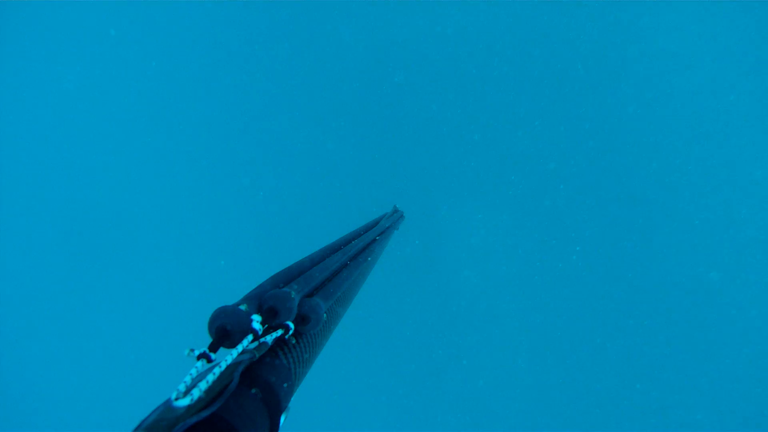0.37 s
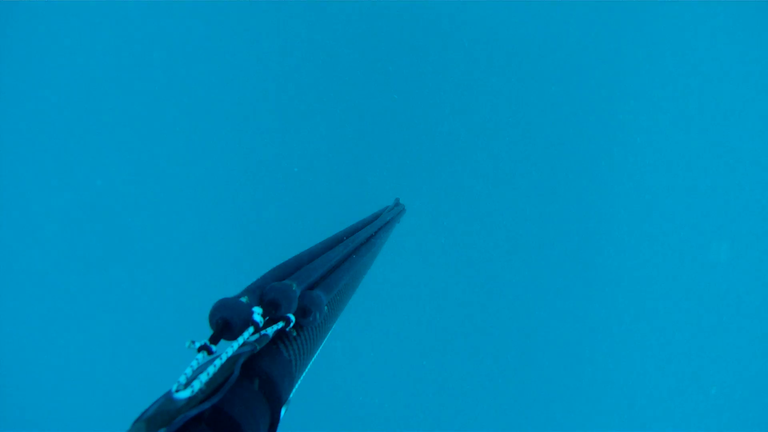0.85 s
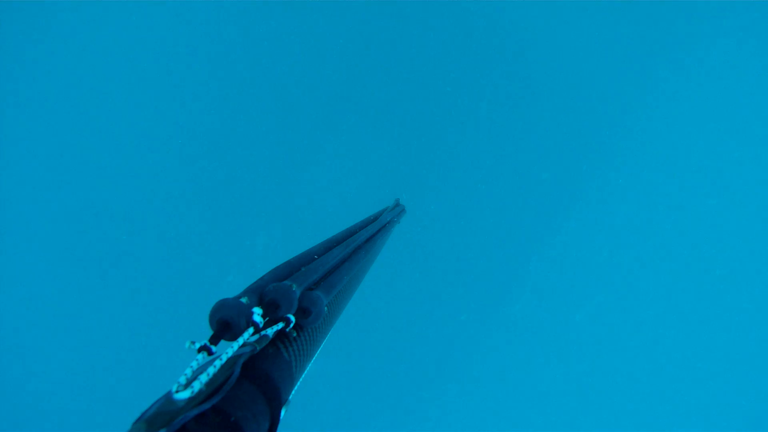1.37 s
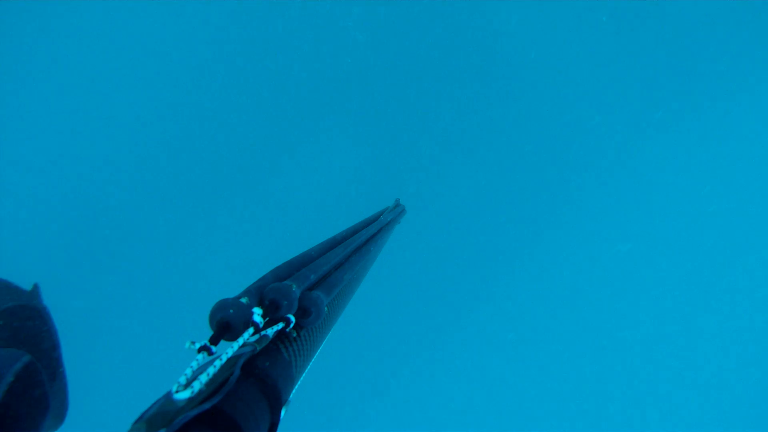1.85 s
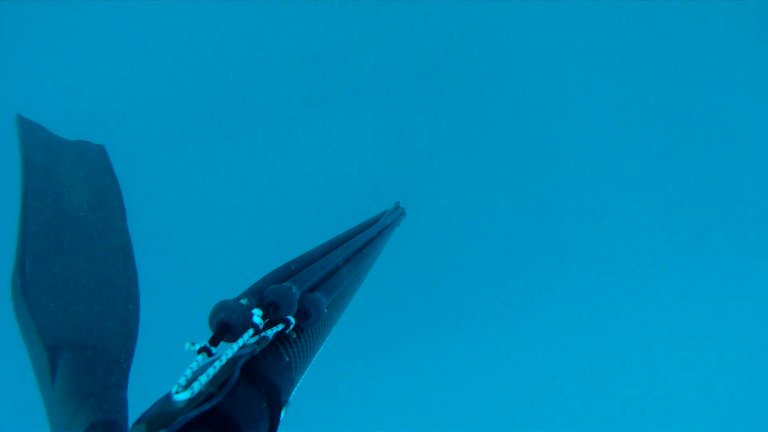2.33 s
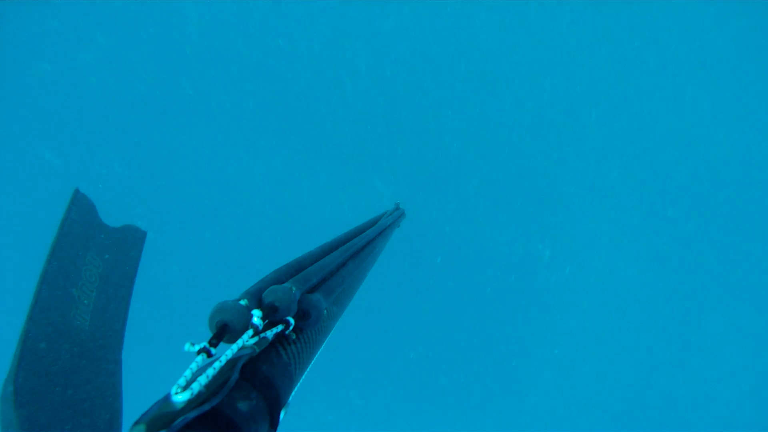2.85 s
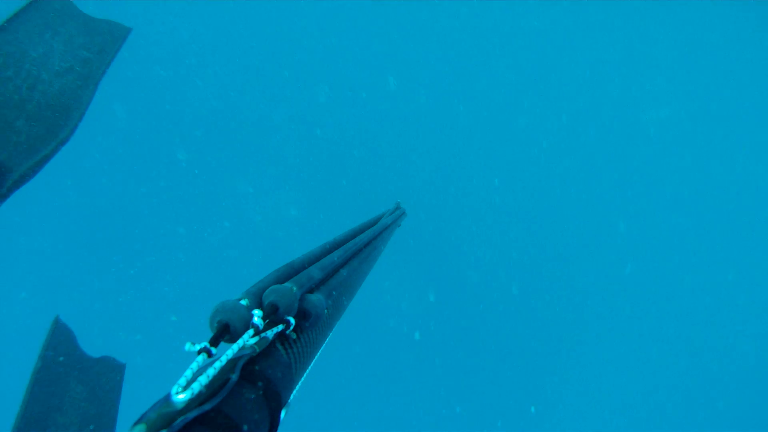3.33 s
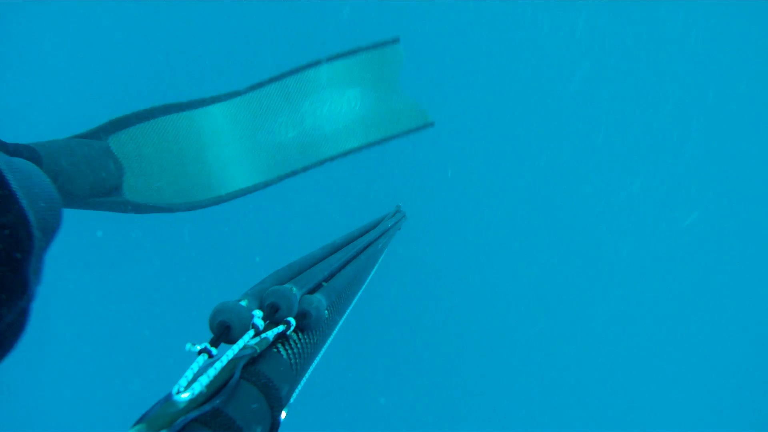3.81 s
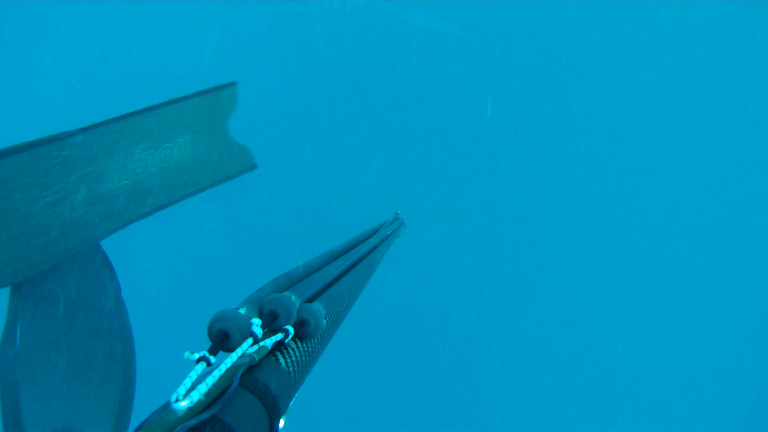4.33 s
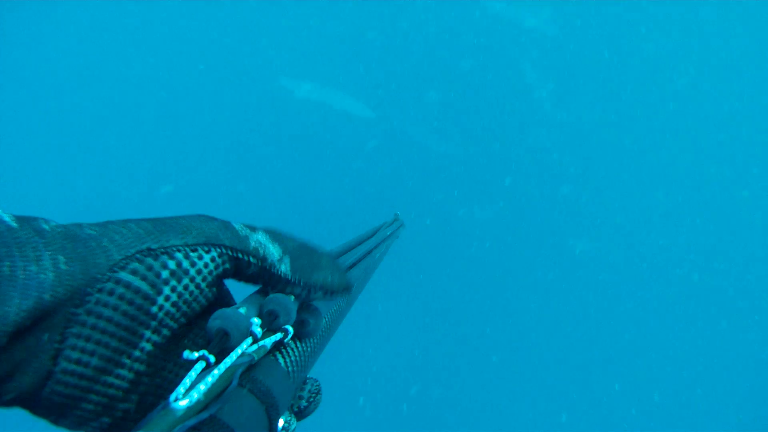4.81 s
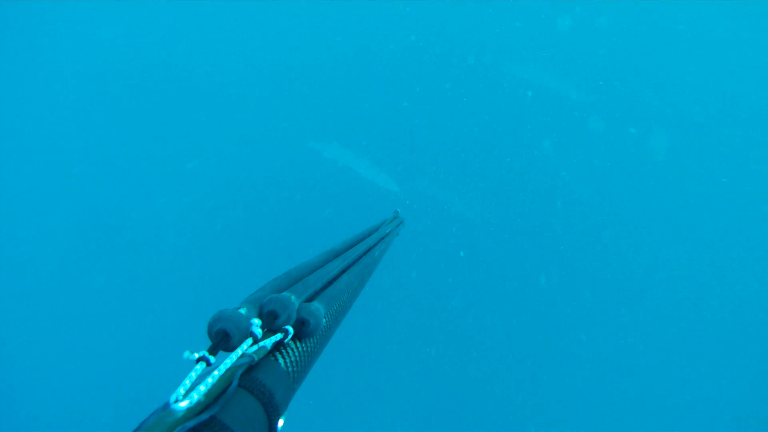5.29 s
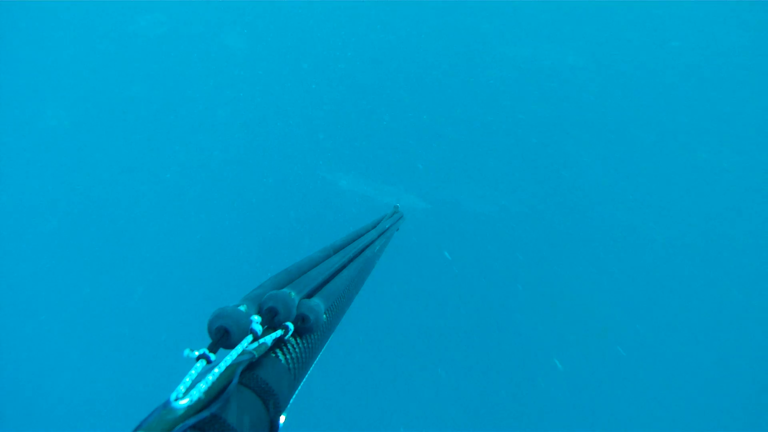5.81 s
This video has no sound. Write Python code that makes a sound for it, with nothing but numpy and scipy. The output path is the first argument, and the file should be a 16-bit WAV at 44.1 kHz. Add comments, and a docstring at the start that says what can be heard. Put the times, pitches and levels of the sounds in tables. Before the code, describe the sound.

Underwater, quiet hiss with tiny clicks and a sudden clipped crack; later, dense hollow clacks, scrapes and low thuds of gun handling, fading to hiss.

```python
"""A gloved hand rubs and rattles a speargun under water, heard by a camera in a hard housing riding on it.
Trains of tiny impacts and stick-slip grains ring the housing's damped modes; jolts sway the mount at a low pitch.
Before the hand come faint shaped-noise hiss, swell rumble, soft knocks, far clicks, a low tone and one sharp snap.
The recorder ducks after loud blows, clips, and holds each sample of a 12 kHz stream, which mirrors the spectrum."""
import sys
import numpy as np
from scipy import signal
from scipy.fft import rfft, irfft, next_fast_len
from scipy.io import wavfile
from scipy.ndimage import uniform_filter1d

SR = 44100
rng = np.random.default_rng(int(sys.argv[2]) if len(sys.argv) > 2 else 0)


def boost(x):
    """Linear amplitude factor 10**(x/20) for a level x in decibels (scalar or array-like)."""
    u = np.asarray(x, float) / 20
    return 10 ** u


def store_pcm(level_fs):
    """Save levels as 16-bit WAV."""
    pcm = np.round(np.clip(level_fs, -1, 1) * 32767).astype(np.int16)
    wavfile.write(sys.argv[1], SR, np.atleast_2d(pcm).T)


N = 271639  # length in samples

# Blows on gun and housing. Each row: start in seconds, peak of the middle modes in dB,
# chatter rate in Hz, treble in dB against that peak, contact length in ms.
BLOWS = [(0.7301, -4, 1723, -27, 3.9), (0.736, 6, 1990, -9.5, 3.6), (0.7541, -19.5, 1930, -8, 1.2),
         (2.8932, -30, 2200, 3, 4.3), (2.965, -42, 2200, -15, 6), (3.681, -31, 1510, -8, 1.5),
         (3.9177, -20, 940, -30, 0.8), (3.96, -12.5, 1750, -13, 1.2), (3.9627, -1.5, 2117, -4, 2.7),
         (3.9832, -35.5, 800, 13.5, 0.9), (3.999, -21.5, 2410, -24, 9.3), (4.0193, -6, 1780, -9.5, 2.3),
         (4.0497, -11.5, 1490, -14.5, 0.9), (4.07, -21.5, 2210, -16, 9), (4.0805, -13, 935, -11, 1.7),
         (4.101, -17, 1710, -22, 3.2), (4.129, -20.5, 814, -22.5, 11.4), (4.143, -13, 946, -15.5, 3.7),
         (4.183, -15, 850, -12.5, 3.6), (4.229, -11.5, 1575, -21, 6.2), (4.2714, -11.5, 1850, -13.5, 0.7),
         (4.2749, -9, 1580, -32, 0.8), (4.2789, 0.5, 1920, -10.5, 1.5), (4.291, -12, 920, -23, 1.6),
         (4.3052, -6.5, 1685, -19, 3.5), (4.3091, 6, 1670, -17.5, 1.6), (4.3323, -21.5, 1500, -20, 1.4),
         (4.349, -23.5, 1440, -45, 2.4), (4.3958, -29, 800, -13, 3), (4.4762, -8, 1116, -15, 4),
         (4.4839, -5.5, 1953, -22, 2.8), (4.489, -6, 810, -9.5, 1.6), (4.503, -9, 1512, -5, 5.6),
         (4.5074, 3.5, 1873, -9, 2.6), (4.517, -17.5, 960, -22, 2.4), (4.582, -23, 954, -16.5, 5.1),
         (4.598, -20, 1437, -7, 9.7), (4.6106, -3.5, 1580, -9, 0.9), (4.6457, -19, 920, -38, 2.6),
         (4.6674, -7, 1900, -12, 0.9), (4.697, -27.5, 920, -13, 3), (4.757, -28, 800, -23, 9.7),
         (4.8031, -9.5, 1760, -17.5, 0.8), (4.808, -15.5, 1740, -11.5, 2.8), (4.8353, -14, 1500, -29, 0.9),
         (4.8482, 3, 1900, -16, 1.6), (4.9321, -10, 960, -26, 0.8), (4.968, -29.5, 1860, -20, 2),
         (5.02, -23, 800, -31, 10.5), (5.047, -19, 1140, -9, 2.5), (5.0538, -13.5, 960, -8, 3.9),
         (5.0872, -7.5, 1570, -23, 1.7), (5.093, -11.5, 1884, -15, 0.8), (5.1017, -16, 850, -2.5, 1.5),
         (5.1284, -18.5, 870, -33, 8.3), (5.143, -20.5, 1944, 5, 4), (5.1524, -8, 2120, -24, 1.4),
         (5.233, -3.5, 1550, -19, 1.7), (5.257, -19, 1900, -12.5, 1.8), (5.276, -29.5, 2110, -12, 1.8),
         (5.3247, -13.5, 1560, -22, 3.1), (5.332, -27, 890, -11, 5), (5.412, -11.5, 1613, -14, 1.1),
         (6.029, -32, 2300, 7, 0.8)]
# Middle modes of the housing. Each row: pitch in Hz, relative level in dB, 60 dB decay time in seconds.
BODY = [(850, -22, 0.076), (960, -4.5, 0.024), (1243, 2, 0.0053), (1575, -4, 0.011), (1939, 0.5, 0.01),
        (2200, -23, 0.025)]
# Gloved hand on the gun, rising with sliding speed. Each row: time in seconds, pressure in dB, brightness in dB.
HAND = [(3.66, -57, 0), (3.775, -57, -7), (3.8, -45.5, -5), (3.9, -40.5, -18), (4.0, -30.5, -2),
        (4.06, -32.5, 1), (4.2, -37.5, -1), (4.3, -37.5, -2), (4.335, -49, -8), (4.39, -36, -5),
        (4.45, -40.5, 4.5), (4.55, -38.5, 0.5), (4.7, -40, 1), (4.78, -34, 3), (4.88, -41, 1),
        (4.99, -40, 12), (5.04, -33, 12.5), (5.07, -36.5, 25.5), (5.1, -29.5, 16.5), (5.12, -36.5, 0),
        (5.145, -33, -4), (5.19, -52, 8.5), (5.43, -61, 9), (5.5, -59.5, 8), (5.69, -66, 1), (5.72, -49, 3),
        (5.8, -44.5, -8), (5.84, -74, 4)]


def unit(x):
    """Scale to rms 1."""
    return x / np.sqrt(np.mean(x ** 2))


def band(x, lo_hz, hi_hz):
    """Band-pass with a second-order Butterworth prototype."""
    return signal.sosfilt(signal.butter(2, [lo_hz, hi_hz], "bandpass", fs=SR, output="sos"), x)


def walk(rate):
    """Random levels held 1 / rate s and slewed; spread near 1."""
    hold = int(SR / rate)
    steps = np.repeat(rng.standard_normal(N // hold + 1), hold)
    return unit(uniform_filter1d(steps, hold)[:N])


def column(table, index, outside=None):
    """One column of a curve, per sample."""
    rows = np.array(table)
    return np.interp(np.arange(N) / SR, rows[:, 0], rows[:, index], left=outside, right=outside)


def add(out, s, sound, db):
    """Mix a short sound in at time s with its peak at db."""
    i = int(s * SR)
    out[i:i + len(sound)] += (boost(db) * sound / np.abs(sound).max())[:N - i]


def swells(rows, t60):
    """Gain that climbs to each (s, dB, rise s) and then dies away; powers add."""
    power = np.zeros(N)
    for s, db, rise_s in rows:
        i = np.arange(max(int((s - 4 * rise_s) * SR), 0), min(int((s + t60) * SR), N))
        late = i / SR - s
        climb, decay = np.exp(-(late / rise_s) ** 2), 1e6 ** (-late / t60)
        power[i] += boost(2 * db) * np.where(late < 0, climb, decay)
    return np.sqrt(power)


def tone(hz, width, waver_db):
    """A soft spring shaken near one pitch: pitch and level waver."""
    turn = np.cumsum(hz + width * walk(25)) / SR
    return unit(np.cos(2 * np.pi * turn) * boost(waver_db * walk(30)))


def ring(modes, lo_hz, hi_hz):
    """What one tiny impact leaves ringing, a row per mode; water damps both ends of the range."""
    t = np.arange(SR // 20) / SR
    rows = np.array([boost(db) * np.sin(2 * np.pi * hz * t) * 1000 ** (-t / t60) for hz, db, t60 in modes])
    return band(band(rows, lo_hz, hi_hz), lo_hz, hi_hz)


def housing_rings():
    """The hard housing as three groups of damped modes: bass, middle and treble."""
    # Each row of both: pitch in Hz, relative level in dB, 60 dB decay time in seconds.
    bass_modes = [(93.7, -2, 0.049), (199, -4, 0.018), (260, -19, 0.0054), (343, -5.5, 0.025),
                  (432.5, 0, 0.015), (624, -1.5, 0.019)]
    treble_modes = [(2604, -2.5, 0.011), (3040, -4, 0.0086), (3486, 5, 0.012), (4000, -35, 0.034),
                    (4860, -7, 0.006), (5170, -23, 0.0048)]
    return ring(bass_modes, 81.3, 712), ring(BODY, 644, 2574), ring(treble_modes, 1720, 5430)


def held(s):
    """Whether the hand is on the gun at time s."""
    return HAND[0][0] < s < HAND[-1][0]


def hiss():
    """Smooth water noise coloured by the housing, flickering a little band by band."""
    # Broad colour. Each row: frequency in Hz, relative spectral level in dB.
    slope = np.array([(53, -62), (90, -7), (140, -18.5), (172, -15.5), (453, -22.5), (795, -20),
                      (1090, -19.5), (1210, -20.5), (1420, -15.5), (2240, -14), (2870, -23.5), (5310, -26),
                      (6000, -36), (7800, -73), (13200, -120)])
    # Peaks on that colour. Each row: centre in Hz, width in Hz, height in dB (negative for a dip).
    peaks = [(670, 18, 2), (800, 25, 9), (1027, 21, -10), (1201, 25, 11), (1537, 110, 7), (1680, 63, 9),
             (1990, 37, 4.5), (2140, 160, 8.5), (2463, 280, 6), (3770, 390, 5.5)]
    # Level of the part above about 1 kHz. Each row: time in seconds, level in dB.
    loudness = [(0, -52), (.32, -50.5), (.7, -53), (1.1, -50.5), (1.68, -54), (2.6, -57.5), (2.92, -54.5),
                (3.1, -55.5), (6.16, -54.5)]
    low_part_db = -4.5  # against the upper part
    size = next_fast_len(N)
    hz = np.arange(size // 2 + 1) * SR / size + 1
    db = np.interp(np.log(hz), np.log(slope[:, 0]), slope[:, 1])
    db = db + sum(p / (1 + (2 * (hz - f) / w) ** 2) for f, w, p in peaks)
    colour = rfft(rng.standard_normal(size)) * boost(db)
    parts = [0, 0]  # upper, low
    for centre in 90 * 2 ** np.arange(7):  # overlapping octave bands
        share = np.clip(1 - np.abs(np.log2(hz / centre)), 0, 1)
        parts[centre < 1000] += irfft(colour * share, size)[:N] * boost(1.6 * walk(11))
    return boost(column(loudness, index=1)) * (unit(parts[0]) + boost(low_part_db) * unit(parts[1]))


def swell_gain():
    """Slow water movement around the gun, as a gain."""
    # Each row: time in seconds, level in dB.
    movement = [(0.0, -44.5), (0.36, -48), (0.51, -60), (0.77, -36.5), (1.22, -51), (2.85, -40.5),
                (3.09, -48), (3.41, -35.5), (3.52, -42.5), (4.1, -23.5), (4.22, -31), (5.06, -29.5),
                (5.13, -21), (5.27, -32.5), (5.63, -33.5), (5.68, -43), (6.11, -34.5), (6.16, -38)]
    return boost(column(movement, index=1))


def rumble(swell):
    """Deep noise that follows the slow water movement."""
    return swell * unit(band(rng.standard_normal(N), 13.7, 37.4))


def mount_sway(swell):
    """The springy mount sways at a low pitch after each jolt; the swell keeps it moving faintly."""
    # Each row: moment of full swing in seconds, level in dB, rise in seconds.
    jolts = [(.35, -48, .03), (.7, -43, .03), (.762, -24.5, 0.0087), (1.3, -49, 0.032), (3.4, -41, 0.041),
             (3.66, -39.5, 0.032), (3.84, -30.5, 0.018), (3.94, -25, .02), (3.99, -21, 0.0098),
             (4.03, -19.5, .012), (4.1, -23.5, 0.018), (4.165, -15, .03), (4.245, -19.5, 0.016),
             (4.32, -16.5, 0.015), (4.485, -11.5, 0.0091), (4.515, -15, 0.0093), (4.625, -17, 0.0088),
             (4.857, -15.5, 0.012), (5.1, -20, .01), (5.16, -22, 0.0085), (5.28, -29, .02),
             (5.42, -27, 0.012), (5.63, -38, 0.016), (5.81, -37, 0.038), (6.04, -40.5, .03)]
    shake_db = -15  # sway kept up by the swell, against the swell's level
    sway = np.hypot(swells(jolts, t60=.3), boost(shake_db) * swell)
    return sway * tone(67.4, width=7.82, waver_db=2.95)


def knocks():
    """Soft knocks: short damped tones with a soft start and some noise around their pitch."""
    # Each row: start in seconds, peak in dB, pitch in Hz.
    soft_knocks = [(.116, -44, 342), (2.84, -48, 380), (2.865, -48, 400), (3.79, -37.5, 353),
                   (3.897, -31, 306), (4.021, -17.5, 304), (4.277, -19, 320), (5.018, -23, 610),
                   (5.091, -13, 433), (5.256, -26, 377), (5.719, -40, 374), (5.723, -37.5, 800),
                   (5.739, -43, 820), (5.778, -29.5, 378), (5.781, -34.5, 854)]
    out = np.zeros(N)
    for s, db, hz in soft_knocks:
        turn = np.arange(SR // 20) * hz / SR
        noise = band(rng.standard_normal(len(turn)), hz / 2, 4 * hz)
        swing = np.sin(2 * np.pi * turn) + 0.45 * noise
        add(out, s, turn * np.exp(-turn / 1.47) * swing, db)  # decay in cycles
    return out


def ticks():
    """Faint far clicks: tiny and broad with a hint of pitch, plus fainter ones at random moments."""
    # Each row: start in seconds, peak in dB.
    far_clicks = [(0.259, -43.5), (0.2896, -43), (0.561, -44), (0.9385, -39.5), (0.9457, -49), (1.34, -48),
                  (2.143, -46.5), (2.7719, -46), (2.8519, -45), (2.9867, -46), (3.2081, -46),
                  (3.2983, -41.5), (3.4296, -39), (3.557, -41), (3.5925, -41.5)]
    mean_hz, stray_count, stray_db = 3660, 11, -47.5
    out, t = np.zeros(N), np.arange(SR // 100) / SR
    strays = [(place * N / SR, stray_db + 5 * (size - .5)) for place, size in rng.random((stray_count, 2))]
    for s, db in far_clicks + strays:
        noise = rng.standard_normal(len(t))
        pitch = np.cos(2 * np.pi * mean_hz * (1 + 0.097 * noise[0]) * t)
        click = (pitch + 2.7 * noise) * t * np.exp(-t / 0.0017)
        add(out, s, band(click, 1900, 5600), db)
    return out


def hum():
    """A faint low tone that comes and goes, wavering in pitch and level."""
    # Each row: loudest moment in seconds, level in dB.
    hum_peaks = [(.78, -45.5), (2.44, -60.5), (2.8, -57.5), (2.98, -50), (3.24, -57.5), (3.64, -51.5),
                 (3.9, -37)]
    rise_s, t60_s = 0.044, 0.42
    gain = swells([(s, db, rise_s) for s, db in hum_peaks], t60_s)
    return gain * tone(170, width=2.9, waver_db=2.5)


def blows(rings):
    """Each contact chatters for a few ms; the train of tiny impacts rings the housing."""
    out, chance = np.zeros(N), rng.standard_normal((len(BLOWS), 66))
    for (s, db, hz, treble_db, ms), c in zip(BLOWS, chance):
        # thud against the peak; 6 dB less while the hand is off the gun
        thud_db = -12 + 0.03 * db - 6 * (not held(s))
        count = int(np.clip(ms * hz / 1000 + .5, 1, 24))
        place = np.cumsum(np.clip(1 + 0.066 * c[:count], .5, 2)) * SR / hz
        train = np.zeros(SR // 40)
        train[(place - place[0]).astype(int)] = boost(5.67 * c[24:24 + count])
        train[0] *= .6  # lighter first touch
        # slow chatter comes from softer, longer pushes
        push = np.hanning(int(np.clip(.45 * SR / hz, 4, 24)))
        soft, hard = np.convolve(train, push), np.convolve(train, push[::2])
        # every spot struck favours other modes; middle modes near the chatter rate ring most
        spots = boost(3 * c[48:]).reshape(3, 6)
        spots[1] *= boost(-2.5 * np.abs(np.log2(np.array(BODY)[:, 0] / hz)))
        levels = (db + thud_db, db, db + treble_db)
        for force, rows, spot, level_db in zip((soft, soft, hard), rings, spots, levels):
            add(out, s, signal.fftconvolve(force, spot @ rows), level_db)
    return out


def gurgle(rate):
    """Trapped water pockets: short low notes that glide, rate of them a second; rms 1."""
    out, t = np.zeros(N), np.arange(SR // 15) / SR
    for place, pitch, glide, size in rng.random((int(rate * N / SR), 4)):
        hz = 140 * 2 ** (2.4 * pitch)
        turn = hz * t * (1 + 10.0 * (glide - .3) * t)
        add(out, place * N / SR, turn * np.exp(-turn / 0.98) * np.sin(2 * np.pi * turn), 12 * size)
    return unit(out)


def rub(rings):
    """Dense stick-slip grains of uneven size, in clumps, excite the same housing modes; water gurgles along."""
    clumps, bright = walk(45), column(HAND, index=2)
    # grit shaken loose rattles on after a blow
    rattle_db, rattle_t60_s = -26, 0.063
    shaken = [(s + .003, db + rattle_db, .001) for s, db, *_ in BLOWS if held(s)]
    pressure = boost(column(HAND, index=1, outside=-99))
    force = np.hypot(pressure, swells(shaken, rattle_t60_s))
    out = force * boost(-0.5) * gurgle(60)
    # bass, middle, treble modes: level in dB, share of brightness, grains a second, clumping in dB
    layers = (-0.5, 0, 500, 3.5), (-6.5, 0.58, 2500, 3.0), (-26, 1.12, 7000, .6)
    for (db, tilt, rate, clump_db), rows in zip(layers, rings):
        hits = (rng.random(N) < rate / SR) * rng.standard_normal(N)
        grains = hits * boost(1.3 * rng.exponential(size=N) + clump_db * clumps)
        scrape = unit(signal.fftconvolve(grains, rows.sum(axis=0))[:N])
        out = out + force * boost(db + tilt * bright) * scrape
    return out


def scene():
    """Water, swaying mount and everything that touches the gun, summed to one channel."""
    swell, rings = swell_gain(), housing_rings()
    water = hiss() + rumble(swell)
    mount = mount_sway(swell) + hum()
    near = knocks() + ticks() + blows(rings) + rub(rings)
    return (water + mount + near)[None]


def top_cut(x):
    """Nothing passes above the cut-off."""
    return signal.sosfilt(signal.butter(12, 15640, fs=SR, output="sos"), x)


def record(dry):
    """Gain control ducks after loud blows; peaks clip; each 12 kHz sample is held four times."""
    held_rate, full_rate, release_s = 12000, 48000, 0.031  # Hz, Hz, s
    x = signal.resample_poly(dry, 40, 147, axis=1)  # to 12 kHz
    over = np.maximum(np.abs(x) - .5, 0)
    release = np.exp(-1 / (release_s * held_rate))
    duck = signal.lfilter([0, 0, 1 - release], [1, -release], over, axis=1)
    late = np.r_[np.zeros(24), np.ones(24) / 24]  # reacts 2-4 ms late
    duck = signal.lfilter(late, 1, duck, axis=1)
    clipped = np.clip(x / (1 + 28 * duck), -.97, .97)
    stepped = np.repeat(clipped, full_rate // held_rate, axis=1)
    mix = signal.resample_poly(stepped, 147, 160, axis=1)[:, :N]  # 48 kHz to SR
    return top_cut(mix)


dry = scene()
out = record(dry)
store_pcm(out)
```